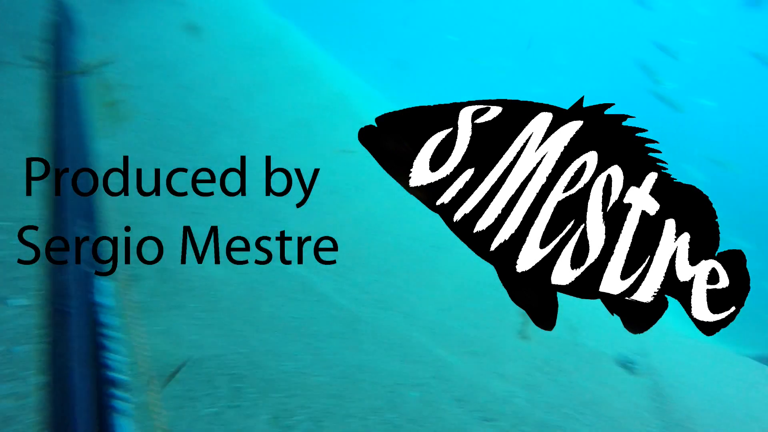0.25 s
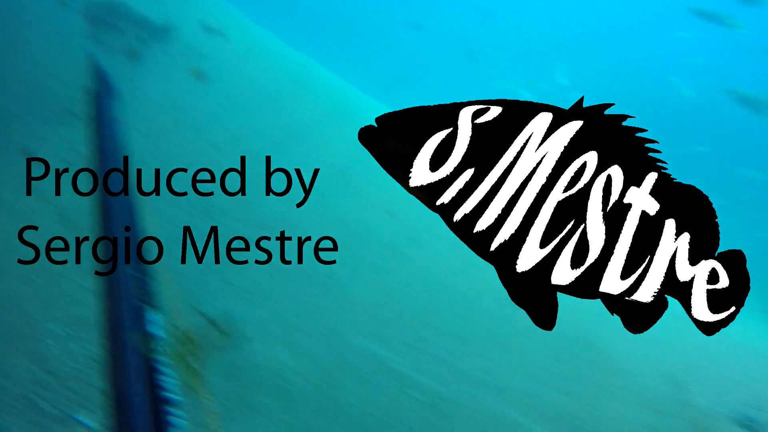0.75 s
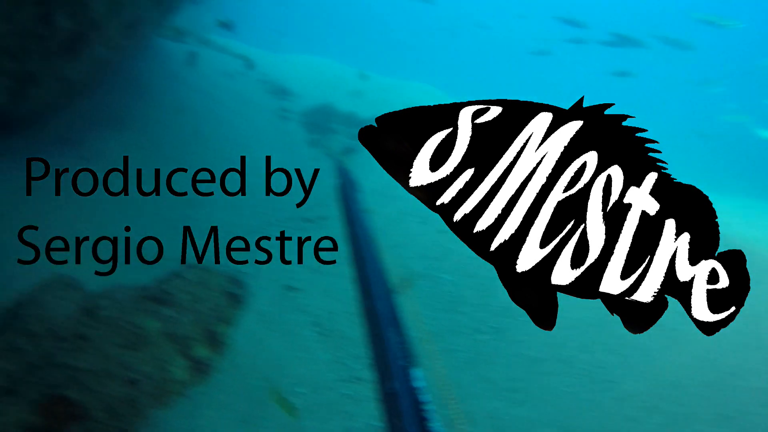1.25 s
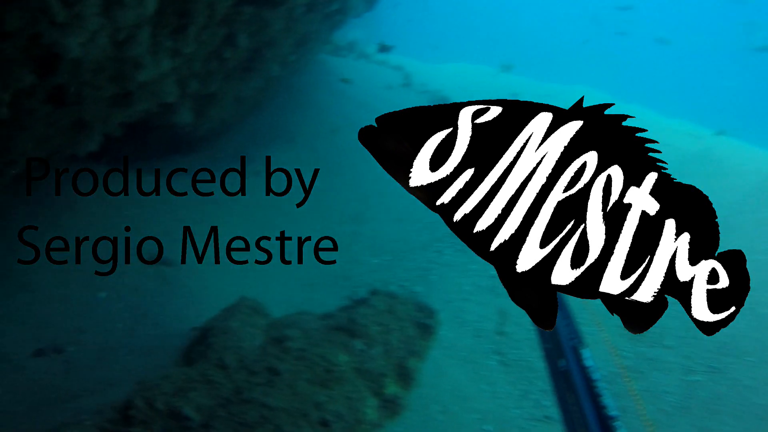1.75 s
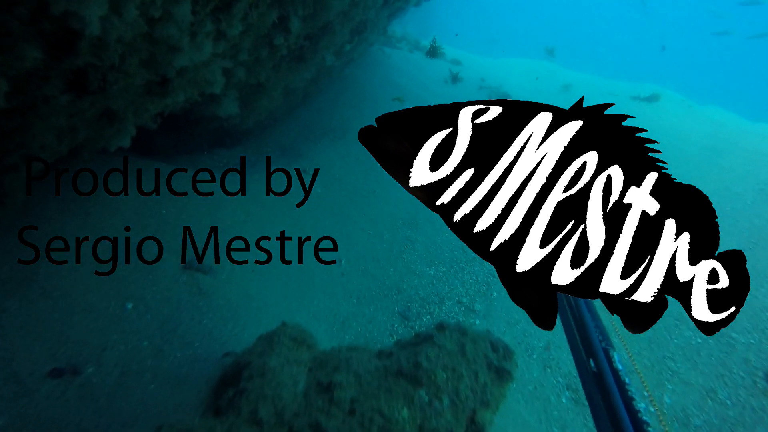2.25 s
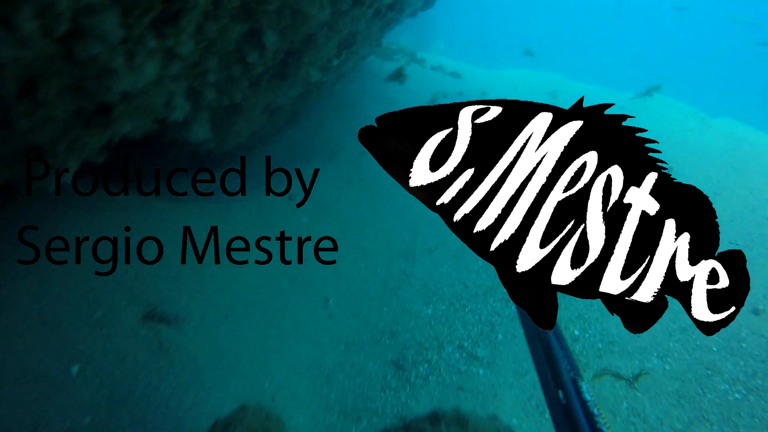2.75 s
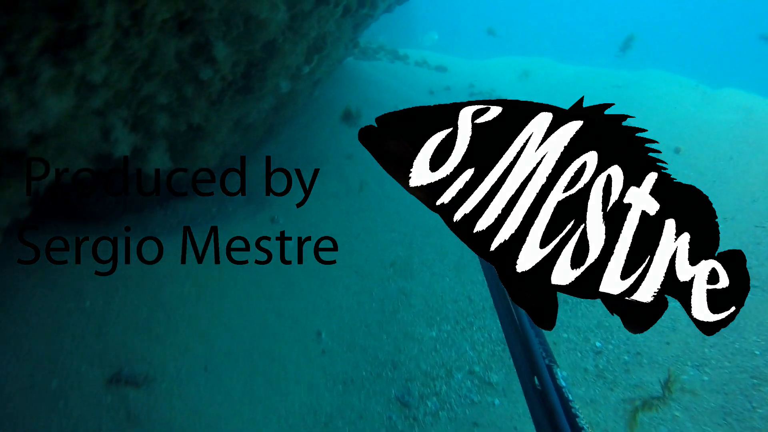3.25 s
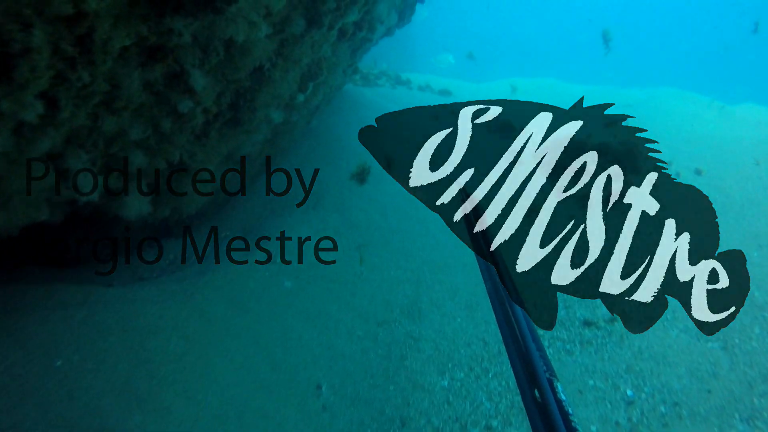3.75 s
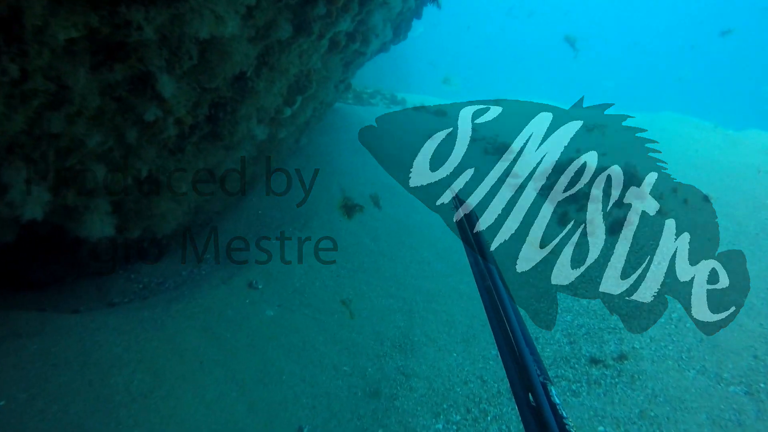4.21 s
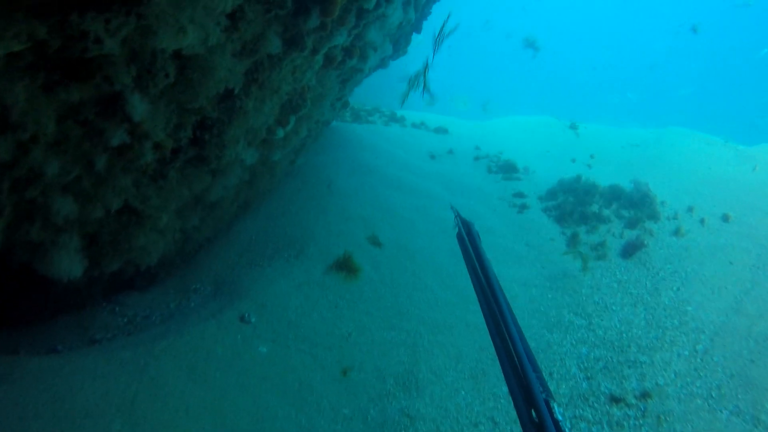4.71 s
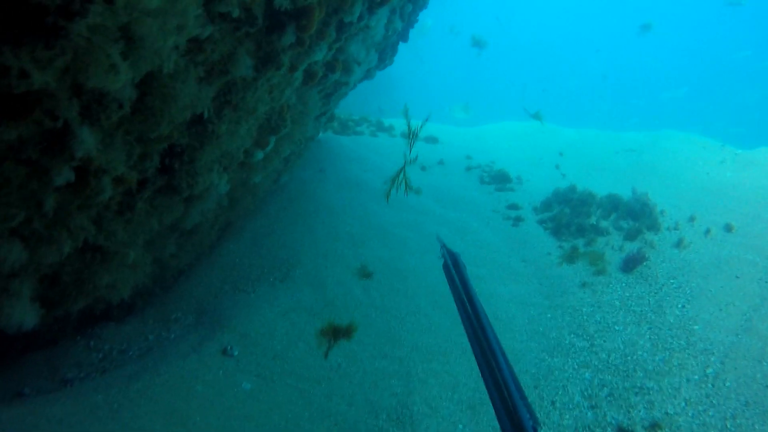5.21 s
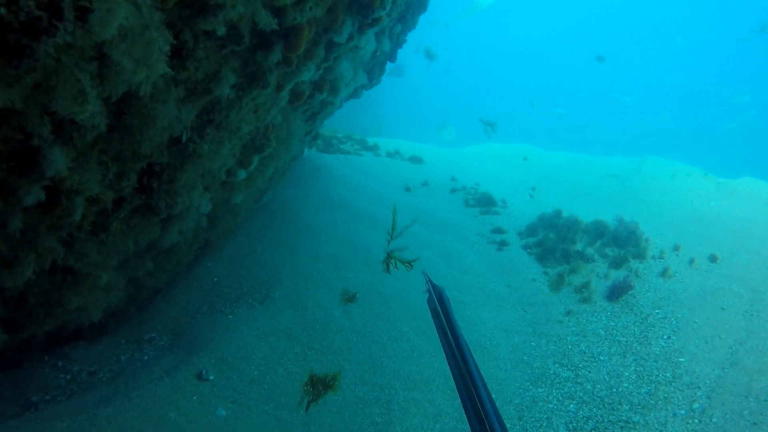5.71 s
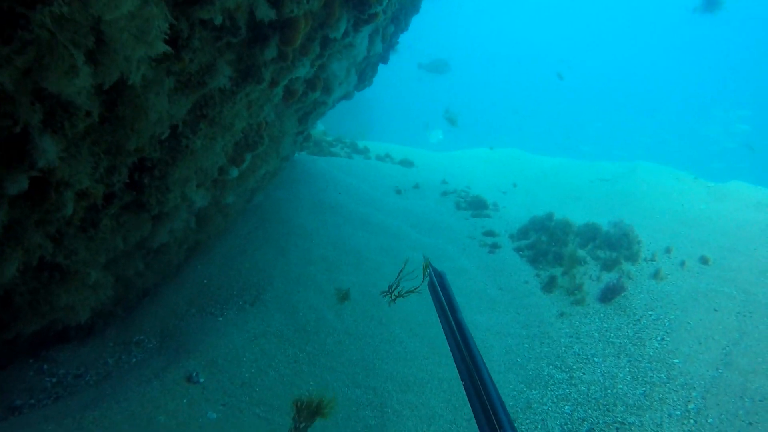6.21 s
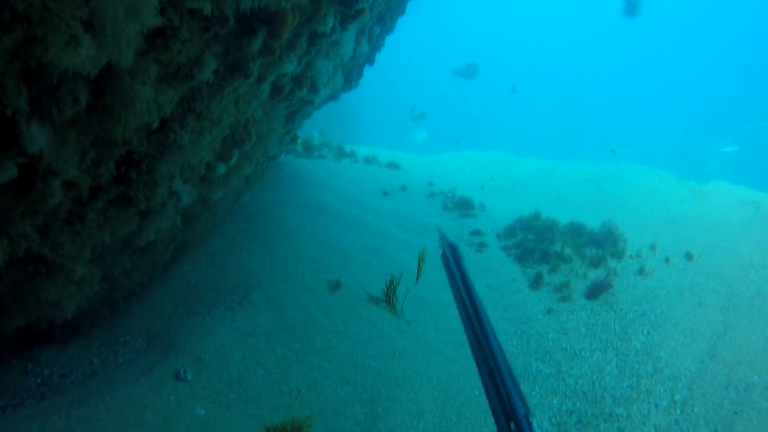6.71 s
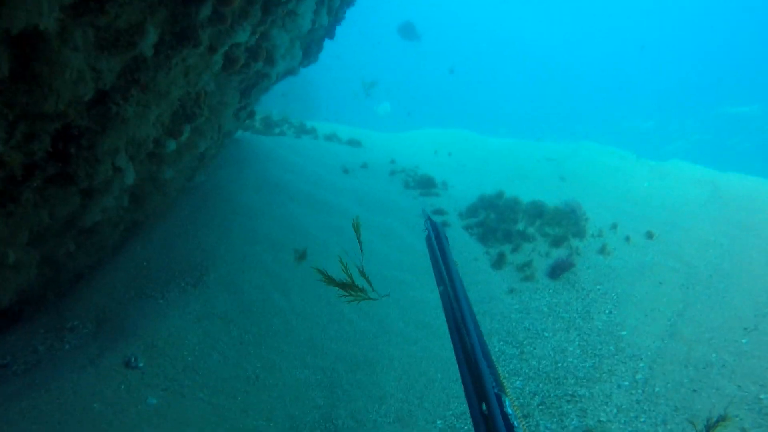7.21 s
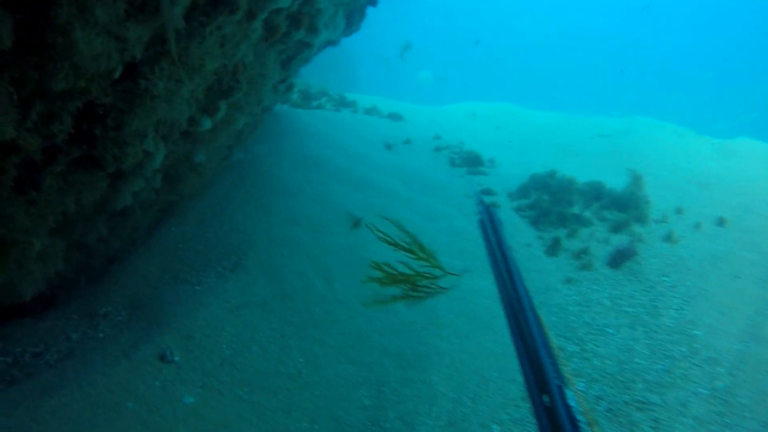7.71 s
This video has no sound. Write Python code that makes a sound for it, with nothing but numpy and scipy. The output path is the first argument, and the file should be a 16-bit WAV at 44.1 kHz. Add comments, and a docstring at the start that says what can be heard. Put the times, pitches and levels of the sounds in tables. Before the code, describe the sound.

Heard from inside a watertight camera case near a sandy seabed and rock: a low, bassy rumble of passing water with soft bumps at the start, slowly easing. Snapping shrimp click constantly, some sharp and close, over finer distant crackle. The rumble sinks away after the middle, leaving clicks and faint wash, then surges back near the end with thuds and a few knocks.

```python
"""A camera in a watertight case glides over sand beside a rock; water rumbles past and soft bumps push the case.
It brakes and comes to rest, then pushes off again, with more bumps and a few hard knocks.
All along, snapping shrimp click near and far: each click is a shaped burst with echoes that rings the case walls.
Shaped noise makes the water, the rubbing, the distant wash and the hiss; fading sine waves make the knocks."""
import sys
import numpy as np
from scipy import signal
from scipy.fft import rfft, irfft, next_fast_len
from scipy.io import wavfile
from scipy.ndimage import uniform_filter1d

SR = 44100
rng = np.random.default_rng(int(sys.argv[2]) if len(sys.argv) > 2 else 0)


def store_wav(level_fs):
    """Save 16-bit WAV to argv[1]."""
    pcm = np.round(np.clip(np.atleast_2d(level_fs), -1, 1) * 32767)
    wavfile.write(sys.argv[1], SR, pcm.T.astype(np.int16))


N = 351014
SIZE = 8192  # samples in one click or filter
# a length at least as long as the scene that is quick to transform, and its frequencies
LONG = next_fast_len(N, real=True)
BINS = np.fft.rfftfreq(LONG, 1 / SR)

# shrimp snaps that stand out, and a few strong echoes just after a loud one (played like snaps), levels before
# a shared gain: # [t/s, level/dB, body level near 1 kHz/dB, treble level near 6 kHz/dB]; the last two relative
# to the middle
SNAPS = [(0.0452, -18, -3, 12), (0.1246, -27, -11, 8), (0.2055, -24, -7, -4), (0.282, -25, -5, 7),
         (0.3098, -27.5, -5, -6), (0.3456, -24, -13, 2.5), (0.4857, -29, -7, -20), (0.701, -19, -5, 6.5),
         (0.8514, -29, -3, -8), (1.0966, -17, -8, -7), (1.1016, -20, 2.5, -8), (1.1683, -25.5, 7, -22),
         (1.3582, -30, -1, 5.5), (1.4696, -29, -4, -14), (1.5845, -28.5, -13, -1.5), (1.7875, -25, 8, -14),
         (2.0324, -26.5, -9, -1), (2.5368, -26, -1.5, -4), (2.7218, -30, -4, 6), (2.852, -11.5, 11.5, -1),
         (2.8655, -24.5, -8, -0.5), (2.9431, -26.5, -2, 4.5), (2.9998, -24.5, -2, -15),
         (3.0412, -34.5, -2, 33), (3.3633, -29, -4, -13), (3.493, -27.5, -5, 4.5), (3.8259, -29, -15, 1),
         (3.895, -27, 9, -16), (4.0769, -15, 5, -10.5), (4.283, -9.5, -9, -10.5), (4.2895, -20.5, -12, -7),
         (4.425, -3.5, 2.5, -7.5), (4.4803, -29, -13, 4.5), (4.6628, -27.5, -6, -19),
         (5.1328, -26.5, -3, -15), (5.2592, -30.5, -1, 7.5), (5.311, -25, -2.5, -19),
         (5.3632, -19.5, 11.5, -16), (5.451, -28.5, -0.5, -6), (5.4949, -30, -4, 2.5),
         (5.503, -26.5, 2, -11), (5.6807, -27, 6, 15.5), (5.9269, -26, -2, -1.5), (6.0987, -27.5, 3, -6),
         (6.1408, -30.5, -2, 8), (6.2856, -27.5, -3, -4), (6.296, -18, 17, -28), (6.4707, -24.5, 8, -26),
         (7.2399, -26, 7, -20), (7.2517, -32, 2, -16), (7.3156, -30, -6, -7), (7.4889, -27.5, -1, -12),
         (7.905, -30.5, -4, 0)]


def near_shrimp(hz, case, rise_s=0.00016):
    """Nearby shrimp snap one by one, a few closely followed by a strong echo; a high-pass filter takes the bass
    out of all of them."""
    out = np.zeros((2, N))
    for s, db, body_db, treble_db in SNAPS:
        # each click sits in the middle of its frame
        frame_start = s + rise_s - SIZE / 2 / SR
        add(out, frame_start, shrimp(hz, case, db, body_db, treble_db))
    no_bass = signal.butter(4, 620, "highpass", fs=SR, output="sos")
    return signal.sosfilt(no_bass, out)


# fainter snaps come from further off, with more echo: [echo level at a 0 dB snap/dB, slope/dB per dB]
SNAP_ECHO = (-30.5, -0.91)
# louder snaps arrive more directly, as an even, dry crack: [direct level at a 0 dB snap/dB, slope/dB per dB]
SNAP_DIRECT = (0, 0.34)


def shrimp(hz, case, db, body_db, treble_db, gain_db=-23.5, scatter_t60=0.0096, smear=0.16):
    """One snap rings the case in its own colour; faint, dull ones are more smeared and wetter."""
    echo_db = SNAP_ECHO[0] + SNAP_ECHO[1] * (db + .5 * max(treble_db, 0))
    direct_db = SNAP_DIRECT[0] + SNAP_DIRECT[1] * db
    smeared_t60 = scatter_t60 * amp(-smear * (db + treble_db))
    arrivals = snap(hz, body_db, treble_db, echo_db, smeared_t60, direct_db)
    return amp(db + gain_db) * struck(case * arrivals)


def snap(hz, low_db, bright_db, echo_db, scatter_t60, direct_db, echo_t60=0.096, size=130):
    """Spectrum of one collapsing bubble, its scatter off the mount, and sparse echoes off the rock."""
    t = np.arange(SIZE) / SR
    near, far = rng.standard_normal((2, 2, SIZE))
    facets = far ** 5  # a high power leaves only a few strong echoes
    scatter = unit(near * amp(-60 * t / scatter_t60))
    echoes = unit(facets * amp(-60 * t / echo_t60) * (t > .004))
    path = scatter + amp(echo_db) * echoes
    arrivals = amp(direct_db) + pair(rfft(path) / np.sqrt(SIZE), hz)
    # scatter cuts fine notches only; the broad colour is the bubble's own
    arrivals /= np.sqrt(uniform_filter1d((abs(arrivals) ** 2).mean(0), size))
    top_db = bright_db - 6.5 + .5 * max(bright_db, 0)
    colour = [(250, low_db - 32), (640, low_db - 18), (860, low_db - 0.5), (1500, low_db + 3.5),
              (2700, -0.12), (3700, -0.5), (5500, bright_db), (14000, top_db)]
    return arrivals * causal(read(colour, hz))


def struck(response):
    """The click of a spectrum, centred in its frame: silent until just before the centre, then a quick rise."""
    t = (np.arange(SIZE) - SIZE // 2) / SR
    front = np.clip(1 + t / .0004, 0, 1)
    return unit(np.fft.fftshift(irfft(response), axes=1) * front)


# broad response of the case: [f/Hz, level/dB]
SHELL = [(730, -0.5), (1000, 1), (2000, 0), (3800, -7.5), (4400, -7), (8000, -10), (10000, -22.5),
         (15000, -44)]
# wall resonances when fully excited: [f/Hz, width/Hz, left level/dB, right level/dB]
WALLS = [(710, 660, 2.5, 3), (1020, 480, 2.5, 1.5), (1412, 160, 6, 0.5), (2095, 88, 8.5, 9.5),
         (2678, 264, 12, 2), (2890, 31, -27, -37), (3034, 340, 6.5, 9), (3710, 340, 11, 7.5),
         (5360, 370, 8.5, -7), (6270, 940, 7.5, 9.5), (7800, 370, -12, 10)]
# the walls rock, so the microphones often move against each other: [f/Hz, lead of the left one/rad]
ROCKING = [(150, -3.5), (280, -2.5), (760, -3.5), (1330, -3), (1620, -1.71), (2150, -3), (2750, -1),
           (3600, -1), (4400, -1.74)]


def case_response(hz, depth=1):
    """The case carries sound from water to both microphones; depth is how fully each wall resonance is excited."""
    walls = []
    for f, width, left, right in WALLS:
        peak = 1 / (1 + (2 * (hz - f) / width) ** 2)
        walls.append(np.outer([left, right], peak))
    db = read(SHELL, hz) + (np.reshape(depth, (-1, 1, 1)) * walls).sum(0)
    common = db.mean(0)
    rocking = np.exp(1j * np.outer([1, 0], read(ROCKING, hz)))
    return causal(common) * amp(db - common) * rocking


# how alike the two microphones hear the water: [f/Hz, coherence from 0 to 1]
ALIKE = [(300, 0.92), (1100, 0.79), (3700, 0.81), (4500, 0.049)]


def pair(spectra, hz, share=1):
    """Sound from many sides differs between the ears: mixes two unrelated spectra into a partly alike pair."""
    alike = np.clip(share * read(ALIKE, hz), 0, 1)
    shared = np.sqrt((1 + alike) / 2) * spectra[0]
    apart = np.sqrt((1 - alike) / 2) * spectra[1]
    return np.array([shared + apart, shared - apart])


# far reef over time, before each layer's own gain: [t/s, murmur level/dB, crackle level/dB]
REEF = [(0, -50.5, -47.5), (1, -52, -54), (4.8, -52, -54), (5.8, -49, -62.5), (7.1, -53, -52),
        (7.96, -49.5, -54.5)]


def crackle(hz, per_s=110, spread_db=6.2, gain_db=1.0, low_db=-1, bright_db=0.5, depth=0.91,
            depth_spread=0.61, count=24):
    """Many colonies further off, dull to bright; each excites the walls differently from its own direction."""
    out = np.zeros((2, N))
    for bright in np.linspace(-1, 1, count):
        when, size = rng.random((2, 400))
        # only as many of the 400 draws sound as the snap rate asks for
        heard = np.arange(len(when)) < per_s * N / SR / count
        loudness = amp(spread_db * np.minimum(-np.log(size), 3))
        train = np.bincount((when * N).astype(int), heard * loudness, N)
        case = case_response(hz, depth + depth_spread * rng.standard_normal(len(WALLS)))
        arrivals = snap(hz, low_db - 5 * bright, bright_db + 11 * bright,
                        echo_db=-10, scatter_t60=.011, direct_db=-4)
        response = case * arrivals
        out += through(train, response / np.linalg.norm(response))
    return amp(gain_db) * unit(out) * level(REEF, order=2)


# noise shapes, relative only: [f/Hz, level/dB]
# the deep rumble of passing water
RUMBLE = [(5, -12), (18, 2.5), (50, -13.5), (100, -23), (200, -35), (3000, -94)]
# swirls heard separately at each microphone
SWIRL = [(15, 7), (95, -8), (1500, -62)]
# churning water close to the case
CHURN = [(40, 12), (150, 4), (330, -5.5), (480, -22), (3000, -60)]
# the soft boom of the case
BOOM_SHAPE = [(30, -14), (105, -40), (138, -2), (162, 0.5), (190, -5.5), (300, -17.5), (500, -20.5),
              (1500, -58.5)]
# larger eddies that wash over the case: [t/s, length/s, rumble level/dB, churning level/dB]
SURGES = [(0.13, 1, -31.5, -58), (1.043, 0.084, -33, -62), (1.878, 0.2, -49, -37),
          (2.276, 0.74, -34.5, -58), (3.09, 0.22, -33.5, -71), (3.877, 0.32, -42.5, -60),
          (7.537, 0.076, -25.5, -61)]


def flow(swirl_db=-18, boom_db=-53.0, stir_db=-18):
    """Eddies press on the case; its low resonance booms softly, and more as they stir it."""
    rumble, churn = water(RUMBLE, apart=0.21), water(CHURN, apart=0.59)
    surge_power = sum((amp(db) * swell(s, length)) ** 2 for s, length, db, _ in SURGES)
    strength = np.sqrt(motion() ** 2 + surge_power)
    churning = sum(amp(db) * swell(s, length) for s, length, _, db in SURGES)
    eddies = (rumble + amp(swirl_db) * noise(SWIRL, count=2)) * strength
    stirred = np.hypot(amp(boom_db), amp(stir_db) * strength)
    boom = water(BOOM_SHAPE, apart=0.72) * stirred * waver(rate_hz=10.4, depth_db=2.0)
    return eddies + churn * churning + boom * amp([[-1], [1]])  # the boom leans to the right


# the camera's motion, as the level of the rumble it makes
GLIDE_DB, DRAG_DB_PER_S = -36.5, 0.5
BRAKE_S, BRAKE_DB_PER_S, REST_DB = 3.74, 12, -64
PUSH_S, PUSH_DB_PER_S, PUSHED_DB = 7.037, 79, -33  # PUSH_S is when the push reaches PUSHED_DB on its slope


def motion():
    """Strength of the passing water: a glide that drag slows, a brake, a rest, a quick push off."""
    t = np.arange(N) / SR
    braking_db = BRAKE_DB_PER_S * np.maximum(t - BRAKE_S, 0)
    glide_db = GLIDE_DB - DRAG_DB_PER_S * t - braking_db
    push_db = PUSHED_DB - PUSH_DB_PER_S * np.maximum(PUSH_S - t, 0)
    return amp(np.maximum(np.maximum(glide_db, push_db), REST_DB))


def water(spectrum, apart):
    """Pressure shared by both microphones, with a part that pushes them apart."""
    shared, side = noise(spectrum, count=2)
    return shared + apart * np.outer([1, -1], side)


# soft bumps on the mount, before the left and right gains: [t/s, level/dB, length/s]
BUMPS = [(.004, -20.5, 0.018), (.179, -32.5, 0.022), (0.262, -23.5, 0.015), (1.935, -33.5, 0.026),
         (7.095, -20.5, 0.026), (7.494, -24, 0.014), (7.51, -24, 0.0058)]
BUMP_HZ = 154.4  # the low resonance that every bump pushes
# hard knocks on the mount and their rebounds, before a shared gain: [t/s, level/dB]
KNOCKS = [(7.5054, -25.5), (7.598, -23), (7.6077, -31)]
# what a knock rings: [f/Hz, level/dB, time to fade by 60 dB/s]
KNOCK_MODES = [(268, 2, 0.037), (506, -11.5, 0.017), (804, 4.5, 0.016), (924, -1, 0.048),
               (1550, -14, 0.027)]


def handling(knock_db=3, contact_s=0.0017, churn_db=-6.0, churn_spread=1.24, left_db=-3, right_db=2.0):
    """Soft bumps push the whole case and churn the water around it; hard knocks rock it."""
    out, t = np.zeros((2, N)), np.arange(N) / SR
    churn = amp(churn_db) * water(CHURN, apart=1.0)
    for s, db, length in BUMPS:
        push = swell(s, length) * np.sin(2 * np.pi * BUMP_HZ * (t - s))
        splash = churn * swell(s, churn_spread * length)
        out += amp(db) * (amp([[left_db], [right_db]]) * push + splash)
    short_t = t[:SIZE]
    ring = np.zeros(SIZE)
    for k, (hz, db, t60) in enumerate(KNOCK_MODES):
        fade = amp(db - 60 * short_t / t60)
        ring += (-1) ** k * fade * np.sin(2 * np.pi * hz * short_t)
    # the contact is not instant, so the ring eases in
    ring *= np.sin(np.pi / 2 * np.minimum(short_t / contact_s, 1)) ** 2
    for s, db in KNOCKS:
        add(out, s, amp(db + knock_db) * np.outer([1, -.2], ring))
    return out


# light rubbing on the case: [t/s, length/s, level/dB]
RUBS = [(3.16, 0.046, -50.5), (5.5, 9.1, -59.5)]


def rub(hz=885, width_hz=125):
    """Light rubbing on the case: noise in a narrow band near 900 Hz, the same on both sides."""
    band = 1 / (1 + (2 * (BINS - hz) / width_hz) ** 2)
    rubbing = irfft(rfft(rng.standard_normal(LONG)) * band, LONG)[:N]
    return unit(rubbing) * sum(amp(db) * swell(s, length) for s, length, db in RUBS)


# noise shape of the distant wash, relative only: [f/Hz, level/dB]
MURMUR = [(90, -58), (200, -2.5), (300, 3), (750, -2.5), (1200, -0.5), (2500, -9.5), (5000, -11.5),
          (9000, -6.5), (15000, -16)]


def murmur(hz, gain_db=4.0, depth=0.59):
    """The farthest snaps and the surge blur into a patchy wash from all sides."""
    spectra = pair(rfft(rng.standard_normal((2, LONG))), BINS, share=0.92)
    wash = irfft(spectra * amp(read(MURMUR, BINS)), LONG)
    heard = patchy(through(wash, case_response(hz, depth)), depth_db=1.5)
    return amp(gain_db) * unit(heard) * level(REEF) * waver(rate_hz=48, depth_db=0.43)


def patchy(x, depth_db, size=512):
    """Lets neighbouring bands swell and fade apart from each other."""
    z = signal.stft(x, nperseg=size)[2]
    field = rng.standard_normal(z.shape[1:])
    field = uniform_filter1d(field, size=14, axis=1)  # smooth along time
    field = uniform_filter1d(field, size=6, axis=0)  # smooth across frequency
    return signal.istft(z * amp(depth_db * unit(field)), nperseg=size)[1][:, :N]


# noise shape of the hiss, relative only: [f/Hz, level/dB]
HISS = [(4000, -11.5), (9800, -1.5), (15000, -18.5)]


def electronics(hiss_db=-62, whine_db=-76):
    """The camera's own hiss and two thin, unsteady whines, one opposed at the microphones and one on the right."""
    whines = []
    for hz in (8565, 8655):
        pitch_hz = hz * waver(rate_hz=20, depth_db=.02)
        whines.append(np.sin(2 * np.pi * np.cumsum(pitch_hz) / SR))
    sides = np.array([whines[0], whines[1] - .5 * whines[0]])
    return amp(hiss_db) * noise(HISS, count=2) + amp(whine_db) * sides


def amp(db):
    """Decibels to gain."""
    return 10 ** (np.asarray(db) / 20)


def unit(x):
    """Scales to an rms (average strength) of 1."""
    return x / np.sqrt(np.mean(x ** 2) + 1e-20)


def read(points, hz):
    """Reads a curve between its points on a log-frequency axis."""
    f, value = np.transpose(points)
    return np.interp(np.log(hz + 1), np.log(f + 1), value)


def level(rows, order=1):
    """One dB column of a curve over time as a gain per sample."""
    rows = np.array(rows)
    return amp(np.interp(np.arange(N) / SR, rows[:, 0], rows[:, order]))


def add(mix, s, sound):
    """Mixes a sound in at time s, cutting what falls outside the scene."""
    start = round(s * SR)
    sound = sound[..., max(-start, 0):]
    part = mix[:, max(start, 0):][:, :sound.shape[-1]]
    part += sound[..., :part.shape[1]]


def noise(spectrum, count=1):
    """Independent steady noises of a given spectrum, rms 1."""
    shaped = rfft(rng.standard_normal((count, LONG))) * amp(read(spectrum, BINS))
    return unit(irfft(shaped, LONG)[:, :N])


def waver(rate_hz, depth_db, size=4096):
    """A gain that drifts at random, from slow noise."""
    hz = np.fft.rfftfreq(size, N / SR / size)
    slow = (hz > 0) / (1 + (hz / rate_hz) ** 4)
    drift = unit(irfft(rfft(rng.standard_normal(size)) * slow))
    return np.interp(np.arange(N) * size / N, np.arange(size), amp(depth_db * drift))


def swell(s, length):
    """A bell-shaped envelope around time s."""
    return np.exp(-np.minimum((2 * (np.arange(N) / SR - s) / length) ** 2, 20))


def causal(db):
    """The response with these gains that rings only after it is struck."""
    log_gain = np.log(amp(np.r_[db, db[-2:0:-1]]))
    return np.exp(np.conj(signal.hilbert(log_gain)))[:len(db)]


def through(x, response):
    """Filters a long sound by a two-channel response."""
    taps = np.fft.fftshift(irfft(response), axes=1)
    return signal.oaconvolve(np.atleast_2d(x), taps, axes=1)[:, SIZE // 2:][:, :N]


def scene():
    """Shrimp and wash through the case, plus flow, handling, rubbing and electronics."""
    hz = np.fft.rfftfreq(SIZE, 1 / SR)
    shrimps = near_shrimp(hz, case_response(hz, depth=0.67)) + crackle(hz)
    return shrimps + flow() + handling() + rub() + murmur(hz) + electronics()


def record(dry, edge_hz=15300):
    """The recorder's input ceiling flattens any higher peak, then its band limit removes the top treble."""
    held = np.clip(dry, -.88, .88)
    taps = signal.firwin(511, edge_hz, window=("kaiser", 9), fs=SR)
    return signal.oaconvolve(held, taps[None], "same", axes=1)


dry = scene()
out = record(dry)
store_wav(out)
```